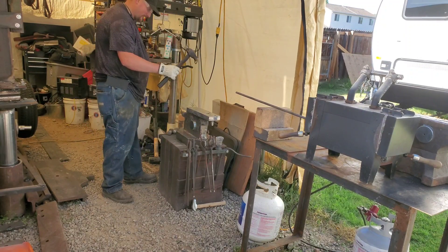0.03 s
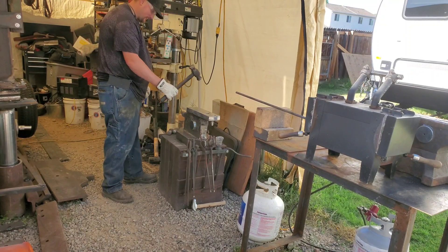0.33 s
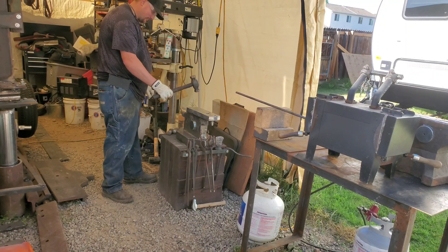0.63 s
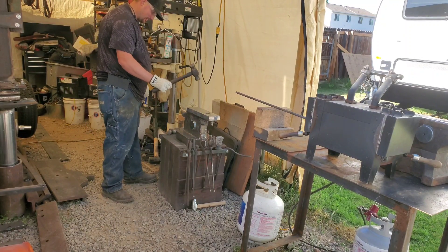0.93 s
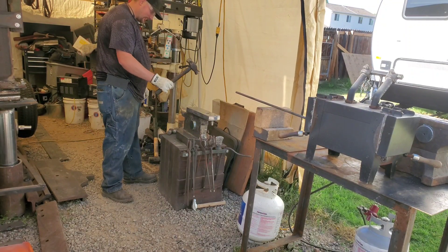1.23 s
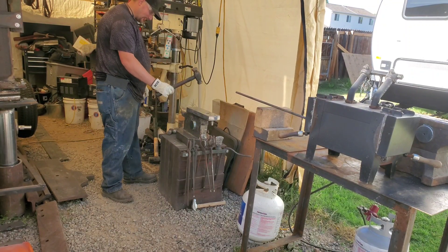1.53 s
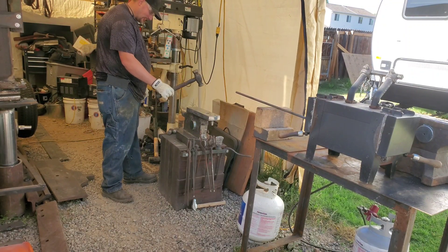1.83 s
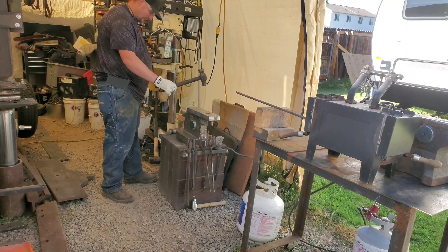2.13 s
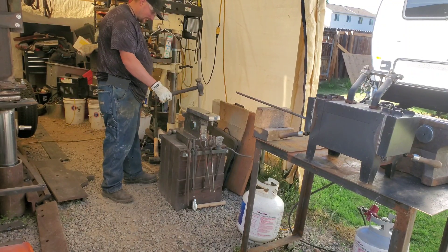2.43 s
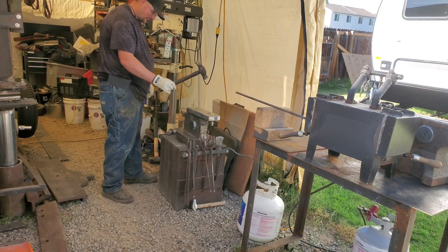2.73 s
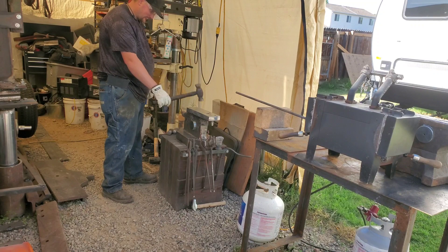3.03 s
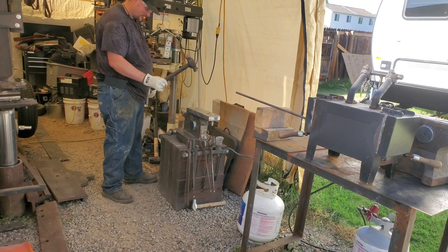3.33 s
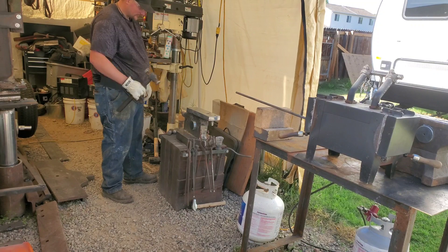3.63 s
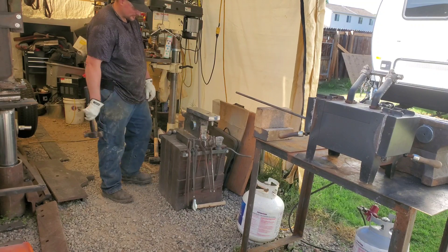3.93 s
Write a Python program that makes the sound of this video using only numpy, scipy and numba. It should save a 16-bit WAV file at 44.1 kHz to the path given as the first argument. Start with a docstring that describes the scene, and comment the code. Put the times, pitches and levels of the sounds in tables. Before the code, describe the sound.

Six evenly paced hammer blows clank and ring on an anvil over a low rumble.

```python
"""An open tent workshop, on a closely spaced microphone pair near a small steel anvil.
A low rumble and faint hiss run from the start, and wind puffs on the microphones in the first 2 s.
From 0.3 s a smith taps the anvil six times, at different places on its face. Each blow cracks and
wakes the anvil's modes differently; the steel stand clanks and the rebounding hammer sings briefly.
Tools, bench and canvas return short reflections. One faint tick comes near the end."""
import sys
import numpy as np
from scipy import signal
from scipy.fft import rfft, irfft
from scipy.io import wavfile
from scipy.ndimage import uniform_filter1d
from numba import njit

SR = 44100
rng = np.random.default_rng(int(sys.argv[2]) if len(sys.argv) > 2 else 0)


def materialize(psi):
    """Save the field psi as 16-bit PCM at rate SR to the path in sys.argv[1].

    A 1-D psi becomes a single channel; in a 2-D psi each row is a channel.
    """
    bounded = np.clip(np.atleast_2d(psi).T, -1, 1)
    quanta = np.round(bounded * 32767).astype(np.int16)
    wavfile.write(sys.argv[1], SR, quanta)


N = 176400


def undb(db):
    """Decibels to gain."""
    return 10 ** (np.asarray(db) / 20)


def fade(t, t60):
    """Exponential decay, 60 dB down after t60 seconds."""
    return np.exp(-np.log(1000) * t / max(t60, 1e-3))


def noise(spectrum, size, channels=2):
    """Unit noise coloured by (pitch_hz, relative_db) points, falling steeply beyond them."""
    hz, db = np.array(spectrum, float).T
    f = np.maximum(np.fft.rfftfreq(size, 1 / SR), 1)
    skirts = np.minimum(hz[-1] / f, 1) ** 4 * np.minimum(f / hz[0], 1) ** 2
    gain = undb(np.interp(np.log(f), np.log(hz), db)) * skirts
    y = irfft(rfft(rng.standard_normal((channels, size))) * gain, size)
    return y / y.std()


def wander(rate_hz):
    """Slow random drift with a spread of 1."""
    span = int(SR / rate_hz)
    steps = np.repeat(rng.standard_normal(N // span + 1), span)
    y = uniform_filter1d(uniform_filter1d(steps, span), span)[:N]
    return y / y.std()


def add(out, start_s, sound):
    """Mix a sound in at its time."""
    i = int(start_s * SR)
    out[:, i:i + sound.shape[1]] += sound[:, :N - i]


def mic_pair(noises, alike_hz=2200):
    """Two microphones close together hear the same lows and unrelated highs."""
    left, other = rfft(noises)
    size = noises.shape[1]
    alike = 1 / (1 + (np.fft.rfftfreq(size, 1 / SR) / alike_hz) ** 2)
    right = alike * left + np.sqrt(1 - alike ** 2) * other
    return irfft(np.array([left, right]), size)


# Spectrum of the rumble: pitch_hz, relative_db
RUMBLE_SPECTRUM = [(25, -11), (55, -5.5), (95, -13.5), (150, -2.5), (265, 2), (310, -14), (345, -9.5),
                   (430, -10), (550, -22.5), (900, -31)]
# Its course, loudest at the start: time_s, level_db
RUMBLE_COURSE = [(.2, -30), (.4, -39), (1.4, -37.5), (4, -35.5)]


def rumble():
    """The low, wavering rumble of the place, the same at both microphones."""
    level_db = np.interp(np.arange(N) / SR, *np.array(RUMBLE_COURSE).T)
    return noise(RUMBLE_SPECTRUM, N, channels=1) * undb(level_db + 1.5 * wander(rate_hz=15))


# Spectrum of wind on a microphone: pitch_hz, relative_db
WIND_SPECTRUM = [(20, -14.5), (70, -4), (140, -16.5), (300, -16.5), (1500, -41)]
# Puffs of wind: peak_s, half_length_s, above_breeze_db
PUFFS = [(0.157, 0.08, 9), (1.016, 0.026, 13), (1.75, 0.066, 8.5)]


def wind(breeze_db=-44.5):
    """A breeze with three puffs, blowing right on each microphone."""
    t = np.arange(N) / SR
    puffs_db = sum(db * np.exp(-((t - peak) / half) ** 2) for peak, half, db in PUFFS)
    return noise(WIND_SPECTRUM, N) * undb(breeze_db + puffs_db - 0.5 * wander(rate_hz=17))


# Spectrum of the hiss: pitch_hz, relative_db
HISS_SPECTRUM = [(1200, -1), (2600, -2.5), (4000, -13), (6000, -4), (9000, -20.5), (12000, -5)]


def hiss(level_db=-59):
    """Faint, steady air in the tent."""
    return undb(level_db) * mic_pair(noise(HISS_SPECTRUM, N))


# Spectrum of the contact crack: pitch_hz, relative_db
CRACK_SPECTRUM = [(300, -17), (1000, 0), (2000, 9), (3000, -0.5), (7500, -7), (15000, -17)]


def crack(t, level_db=-16.5, t60_s=0.022, chatter_per_s=190, chatter_db=1.5, chatter_t60_s=0.04):
    """Steel meets steel, then the anvil chatters on its stand in a fading train of hits."""
    chance, size = rng.random((2, len(t)))
    hits = (chance < chatter_per_s / SR) * size * undb(chatter_db) * fade(t, chatter_t60_s)
    hits[0] = 1  # the blow itself
    power = signal.fftconvolve(hits ** 2, fade(t, t60_s) ** 2)[:len(t)]
    return undb(level_db) * np.sqrt(np.abs(power)) * mic_pair(noise(CRACK_SPECTRUM, len(t)))


def knock(t, pitch_hz=582, level_db=-9, t60_s=0.0099, delay_s=0.0012):
    """The blow drives the stand into the ground with a dull knock."""
    age = np.maximum(t - delay_s, 0)
    envelope = fade(age, t60_s) * np.tanh(2 * pitch_hz * age)
    return undb(level_db) * envelope * np.sin(2 * np.pi * pitch_hz * age)


def contact(ground_db=-9.5, ground_delay_s=0.0048):
    """Crack and knock reach the microphones directly, then by a longer path off the ground."""
    t = np.arange(SR // 8) / SR
    direct = crack(t) + knock(t)
    reflected = np.pad(direct, ((0, 0), (int(ground_delay_s * SR), 0)))[:, :len(t)]
    return direct + undb(ground_db) * reflected


def left_lead(hz, most_rad=1.53, corner_hz=1670):
    """Phase by which the left microphone leads, most in the treble."""
    return most_rad * np.tanh(hz / corner_hz)


def partial(t, hz, pan_db, waver_hz=16.55, waver_depth=0.28):
    """One ringing mode at the two microphones, its level wavering a little at each."""
    phase = rng.uniform(0, 2 * np.pi) + left_lead(hz) * np.array([[1], [0]])
    drifts = rng.standard_normal((2, 64))
    waver = np.array([np.interp(t * waver_hz, np.arange(64), drift) for drift in drifts])
    sides = undb(np.array([[pan_db], [-pan_db]]) / 2)
    sides /= np.sqrt(np.mean(sides ** 2))
    return sides * np.exp(waver_depth * waver) * np.sin(2 * np.pi * hz * t + phase)


RING_RISE_S = 0.0055  # anvil ring and clank
# Anvil modes: pitch_hz, level_db, t60_s, left_over_right_db, half_waves_along_face, node_place (0-1)
ANVIL_MODES = [(1051.6, -34, 3.14, -2.5, 1.075, 0.08), (1389.7, -25.5, 1.37, -0.5, 2.704, 0.24),
               (1672, -10.5, 0.18, -0.5, 3.16, 0.07), (2177.3, -15.5, 0.81, 8, 2.155, 0),
               (2460, -14, 0.18, -5.5, 5.42, 0.02), (3240, -26, 0.72, 2, 0.94, 0.97),
               (3841, -32, 1.07, 5.5, 0.64, 0.44), (3933, -14, 0.26, 6.5, 0.49, 0.75),
               (4317, -22, 0.38, 10, 1.13, 0.22), (4470, -12.5, 0.25, 4, 2.24, 0.08),
               (4658, -32, 1.1, -11, 4.53, 0.16), (4880, -10.5, 0.2, 0.5, 5.99, 0.11),
               (4990, -27, 0.81, 2.5, 4.72, 0.07), (5090, -2, 0.2, 2.5, 2.19, 0.13),
               (5280, -18, 0.202, -4.5, 2.58, 0.16), (5428, -12, 0.27, 6, 2.46, 0.13),
               (5736, -18, 0.25, -3, 1.06, 0.16), (7103, -19.5, 0.76, -1, 2.526, 0.11),
               (7350, -20, 0.32, -3, 4.84, 0.19), (7820, -23, 0.72, 5, 2.06, 0.115),
               (10700, -38.5, 0.36, -10, 2.68, .345), (11610, -20.5, .19, -4, 2.36, .17),
               (13170, -27, .25, -8, 2.14, .115)]


def anvil(place, node_leak=0.062):
    """Each mode rings according to how far the blow lands from its nodes."""
    out = np.zeros((2, 2 * SR))
    for hz, db, t60, pan_db, half_waves, node in ANVIL_MODES:
        t = np.arange(int(min(t60, 2) * SR)) / SR
        drive = np.hypot(node_leak, np.sin(np.pi * half_waves * (place - node)))
        envelope = fade(t, t60) * (1 - np.exp(-t / RING_RISE_S))
        add(out, 0, undb(db) * drive * envelope * partial(t, hz, pan_db))
    return out


TOP_HZ = 14600  # upper edge of the clank and of the microphone channels
# Trend of the resonances of anvil and stand: pitch_hz, mode_level_db, t60_s, left_over_right_db
CLANK_TREND = [(398.3, -43, 0.075, -1.5), (700, -33, 0.08, -1.5), (983, -30.5, 0.13, -6.5),
               (1210, -43, 0.15, 2.5), (1730, -25, 0.083, -1.5), (2390, -24.5, 0.13, 5),
               (2840, -38.5, 0.16, -3.5), (4990, -27.5, 0.18, 5), (8500, -53, 0.23, 0.5),
               (11400, -38.5, 0.23, -4), (14500, -34.5, 0.17, -6)]


def clank_pitches(base_gap_hz=25.24, gap_share=0.016):
    """Anvil and stand resonate at irregular pitches, further apart towards the treble."""
    hz = [CLANK_TREND[0][0]]
    for stretch in rng.uniform(0.5, 1.5, size=400):
        hz.append(hz[-1] + stretch * (base_gap_hz + gap_share * hz[-1]))
    return np.array(hz)


def clank(hz, scatter_db=4.5):
    """A crowd of weak, quickly damped resonances of anvil and stand, each woken by chance."""
    t = np.arange(SR // 2) / SR
    trend_hz, *columns = np.array(CLANK_TREND, float).T
    db, t60, pan_db = (np.interp(np.log(hz), np.log(trend_hz), column) for column in columns)
    size, phase, skew = rng.standard_normal((3, len(hz)))
    lead = left_lead(hz) * (1 + skew / 2)
    gain = undb(db + scatter_db * size) * np.exp(1j * np.pi * phase)
    sides = gain * np.array([undb(pan_db / 2) * np.exp(1j * lead), undb(-pan_db / 2)])
    heard = hz < TOP_HZ
    poles = 2j * np.pi * hz - np.log(1000) / t60
    rings = np.exp(np.outer(poles[heard], t))  # one damped tone a row
    return (sides[:, heard] @ rings).imag * (1 - np.exp(-t / RING_RISE_S))


# Modes of the hammer head: pitch_hz, level_db, hold_factor, t60_s, left_over_right_db
HAMMER_MODES = [(1962, -15.5, 1.365, 0.21, -2), (5899, -16.5, 0.77, 0.33, -4.5),
                (13900, -32.5, 1.07, .22, -15)]


def hammer(hold_s, swell_s=0.074):
    """The head's ring swells as it bounces clear of the face, holds, then dies."""
    t = np.arange(SR // 2) / SR
    ring = np.zeros((2, len(t)))
    for hz, db, hold_factor, t60, pan_db in HAMMER_MODES:
        hold_then_decay = 1 / np.hypot(1, fade(hold_factor * hold_s - t, t60))
        ring += undb(db) * hold_then_decay * partial(t, hz, pan_db)
    return np.interp(t, [0, swell_s], [0.46, 1]) * ring


def workshop(direct, level_db=-11.5, t60_s=0.26, delay_s=0.013):
    """Tools, bench and canvas scatter brief reflections, which arrive behind the direct sound."""
    t = np.arange(SR // 2) / SR
    echo = rng.standard_normal((2, len(t))) * fade(t, t60_s) * (t > delay_s)
    echo /= np.sqrt((echo ** 2).sum(1, keepdims=True))
    return direct + undb(level_db) * signal.fftconvolve(direct, echo, axes=1)[:, :N]


# Spectrum of the tick: pitch_hz, relative_db
TICK_SPECTRUM = [(1200, 5), (2800, -8), (9000, -29)]


def tick(level_db=-43.5, t60_s=0.071):
    """One faint tick somewhere in the tent."""
    t = np.arange(SR // 4) / SR
    return undb(level_db) * fade(t, t60_s) * mic_pair(noise(TICK_SPECTRUM, len(t)))


# The smith's blows: start_s, ring_db, contact_and_clank_db, hammer_db, hold_s, place_on_face (0-1)
HAMMER_BLOWS = [(0.2826, -1.5, 0, -6, .11, 0.05), (0.7864, 1.5, 2.5, -9.5, 0.1, 0.98),
                (1.4668, -0.5, 5, -5.5, .1, 0.96), (2.026, -1, 3.5, -2, 0.071, 0.1),
                (2.5768, 0.5, 4.5, -4, 0.08, 0.14), (3.148, 0, 4, -5, 0.079, 0.59)]


def scene():
    """At the microphones: six blows and a tick in the workshop, over rumble, wind and hiss."""
    out = np.zeros((2, N))
    clank_hz = clank_pitches()  # the same steel for every blow
    for start_s, ring_db, clank_db, hammer_db, hold_s, place in HAMMER_BLOWS:
        add(out, start_s, undb(clank_db) * contact())
        add(out, start_s, undb(ring_db) * anvil(place))
        add(out, start_s, undb(clank_db) * clank(clank_hz))
        add(out, start_s, undb(hammer_db) * hammer(hold_s))
    add(out, start_s=3.85, sound=tick())
    return workshop(out) + rumble() + wind() + hiss()


@njit
def follow(x, attack, release):
    """Envelope follower with separate rates of rise and fall."""
    envelope, level = np.empty(len(x)), 0.
    for i in range(len(x)):
        level += (x[i] - level) * (attack if x[i] > level else release)
        envelope[i] = level
    return envelope


def record(dry):
    """Behind the microphones a look-ahead limiter holds the blows down, peaks clip and the top is cut."""
    limit_db, attack_s, release_s = -11.5, 0.0012, 0.0064
    level = follow(np.abs(dry).mean(0), 1 / (attack_s * SR), 1 / (release_s * SR))
    ahead = np.interp(np.arange(N) + attack_s * SR, np.arange(N), level)
    limited = dry / np.maximum(ahead / undb(limit_db), 1)
    lowpass = signal.ellip(10, 0.2, 85, TOP_HZ, fs=SR, output="sos")
    return signal.sosfilt(lowpass, np.clip(limited, -0.85, 0.85))


dry = scene()
out = record(dry)
materialize(out)
```